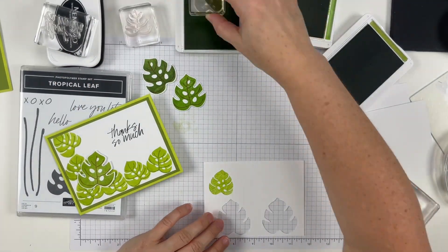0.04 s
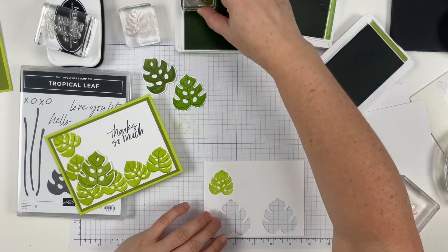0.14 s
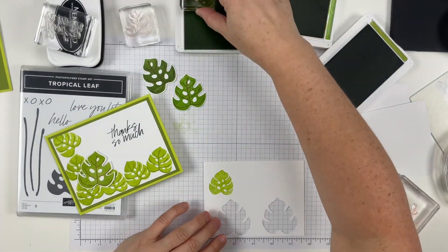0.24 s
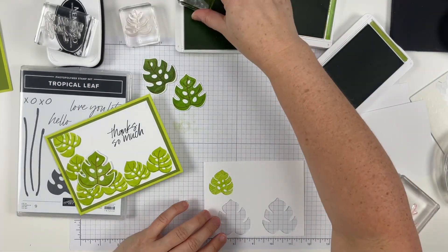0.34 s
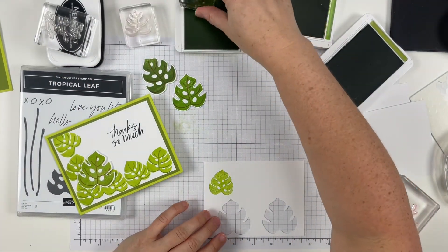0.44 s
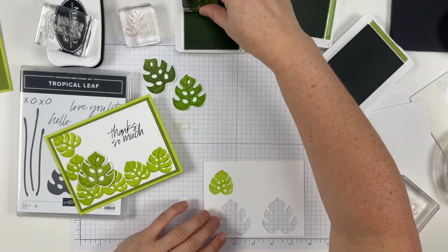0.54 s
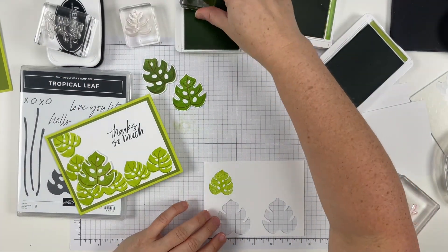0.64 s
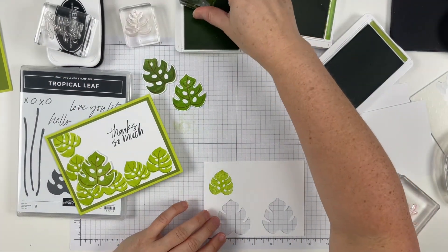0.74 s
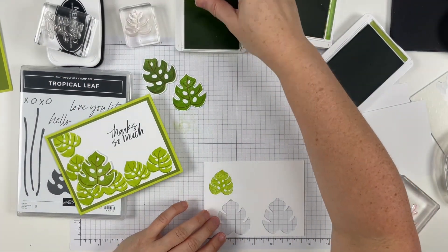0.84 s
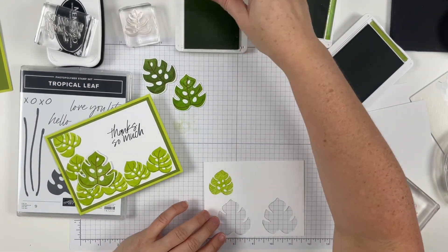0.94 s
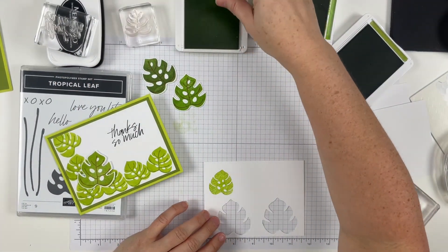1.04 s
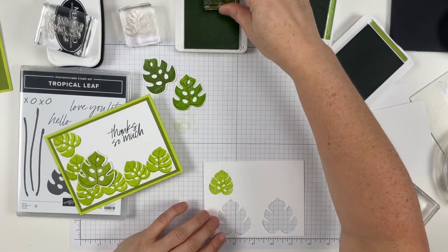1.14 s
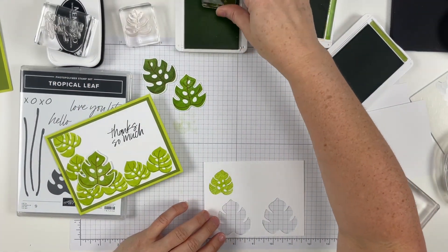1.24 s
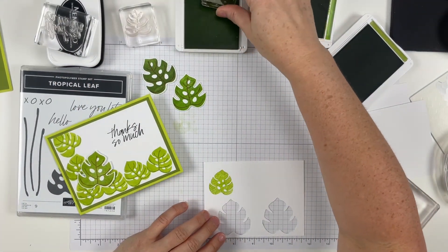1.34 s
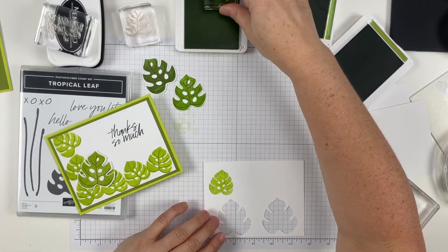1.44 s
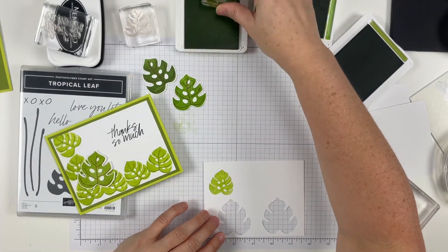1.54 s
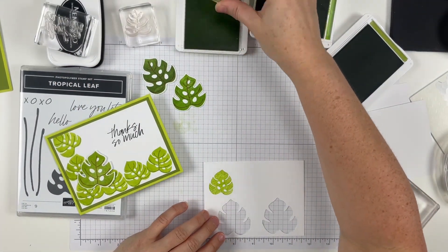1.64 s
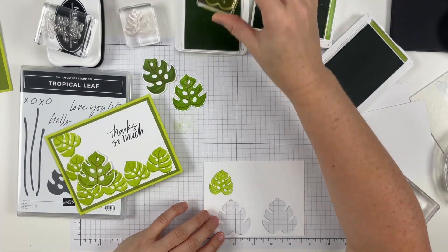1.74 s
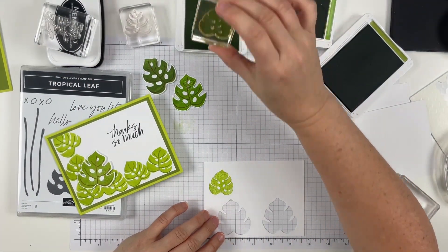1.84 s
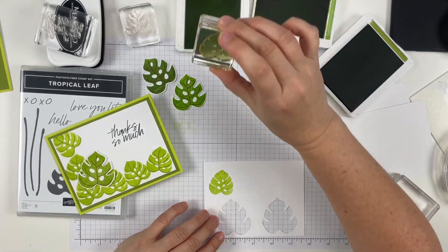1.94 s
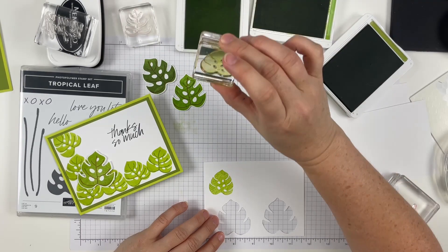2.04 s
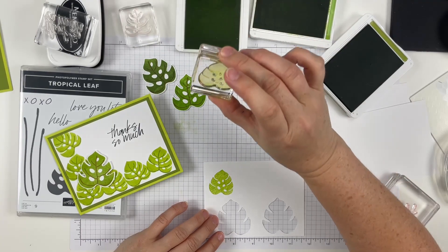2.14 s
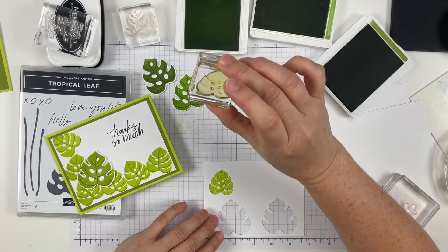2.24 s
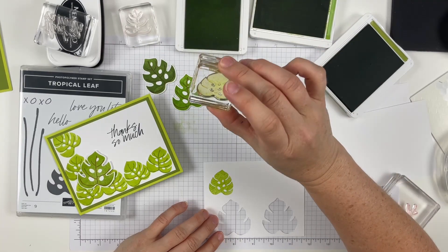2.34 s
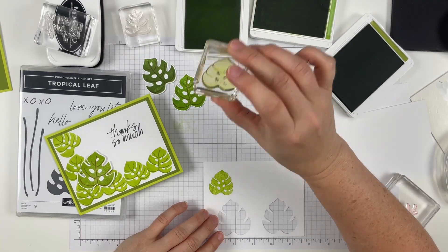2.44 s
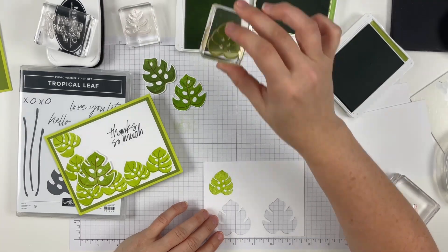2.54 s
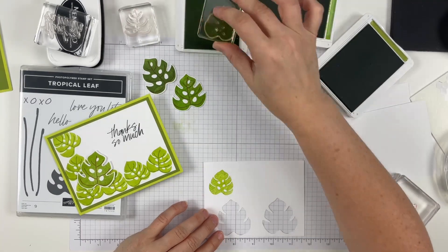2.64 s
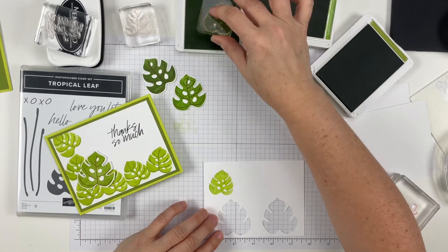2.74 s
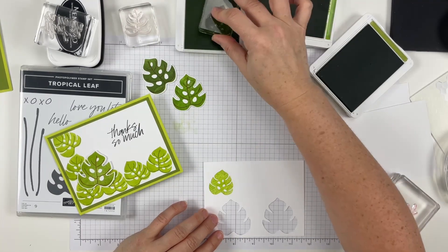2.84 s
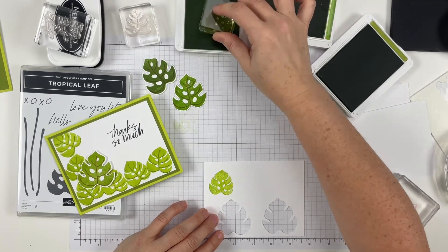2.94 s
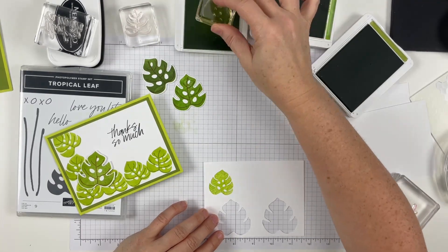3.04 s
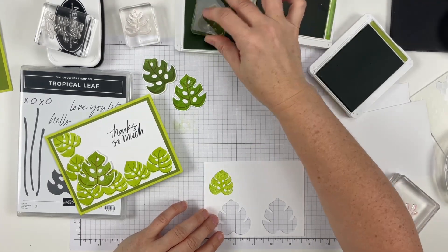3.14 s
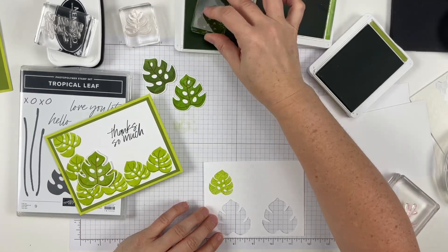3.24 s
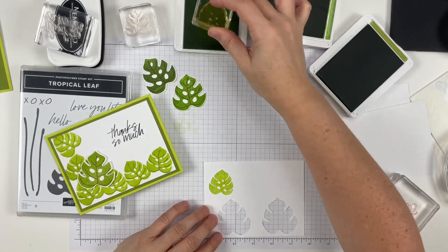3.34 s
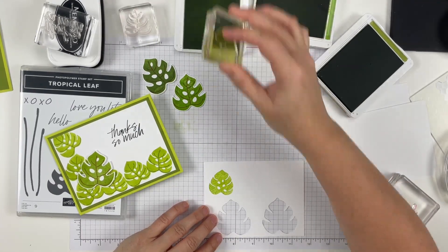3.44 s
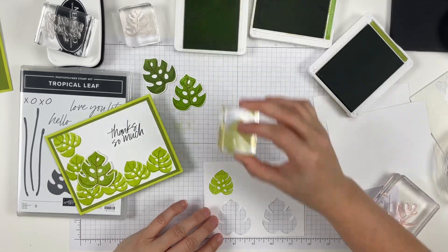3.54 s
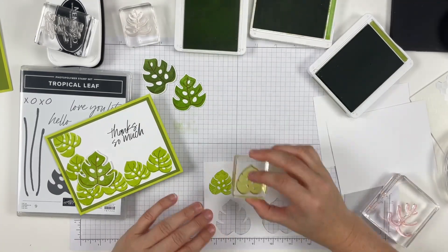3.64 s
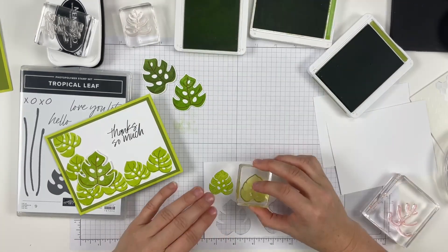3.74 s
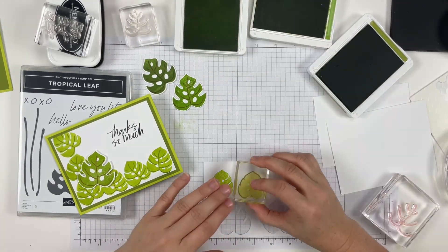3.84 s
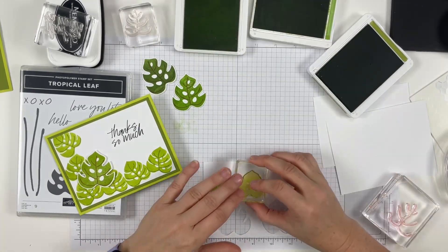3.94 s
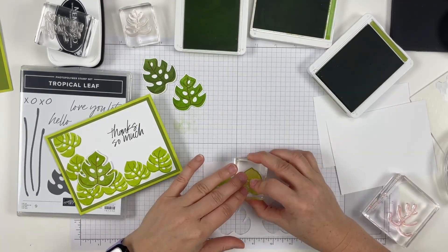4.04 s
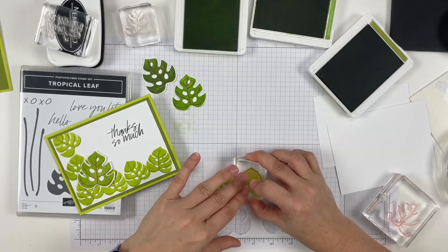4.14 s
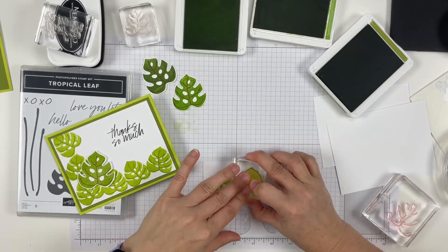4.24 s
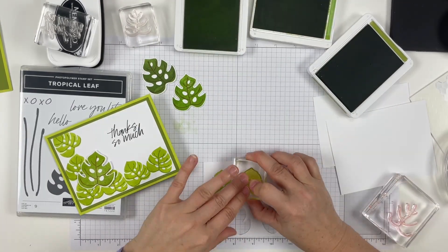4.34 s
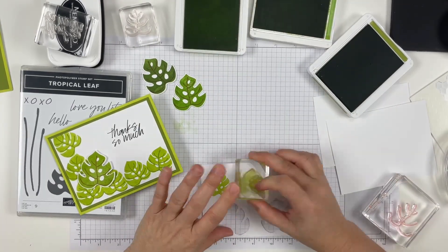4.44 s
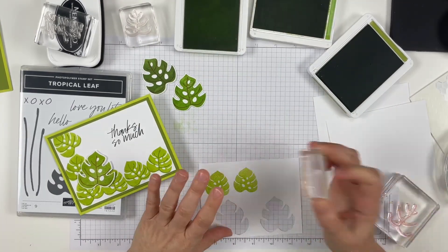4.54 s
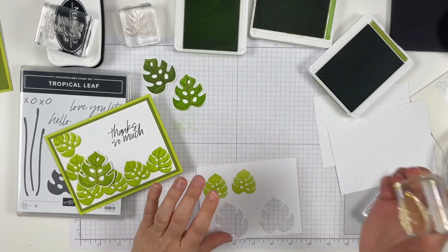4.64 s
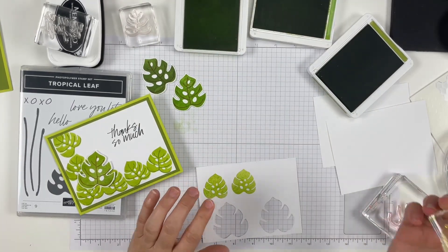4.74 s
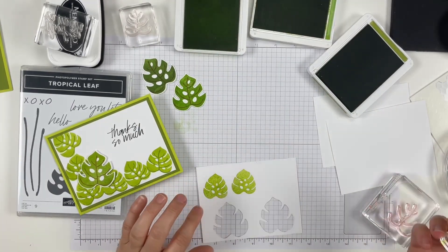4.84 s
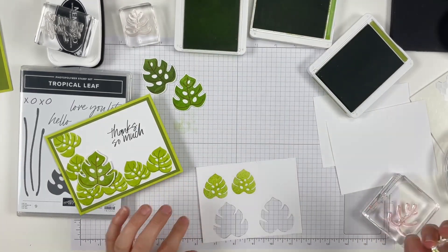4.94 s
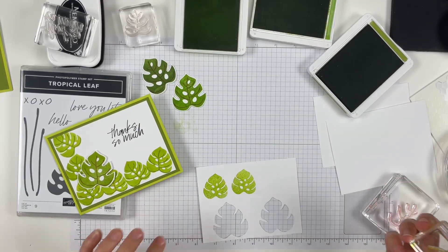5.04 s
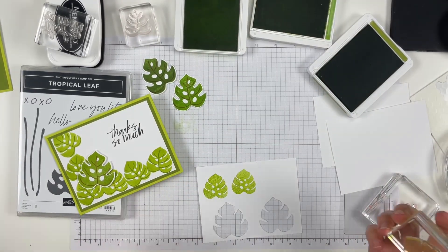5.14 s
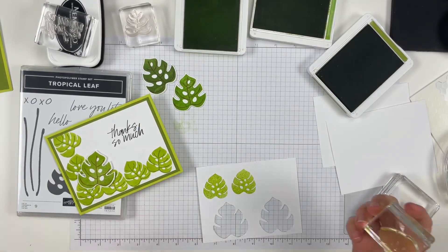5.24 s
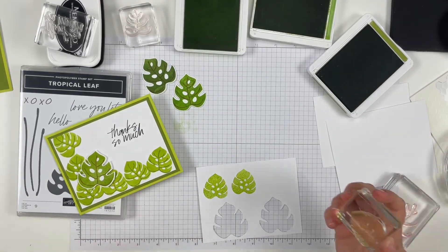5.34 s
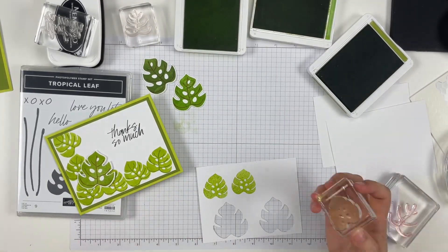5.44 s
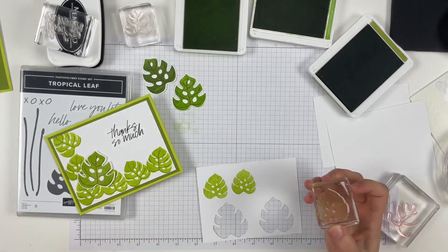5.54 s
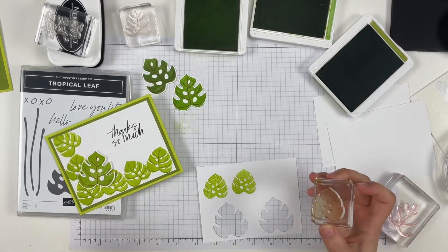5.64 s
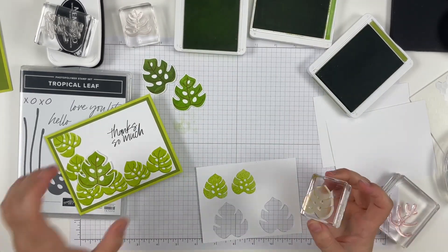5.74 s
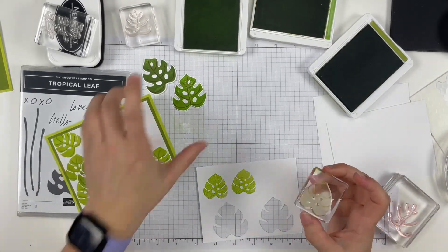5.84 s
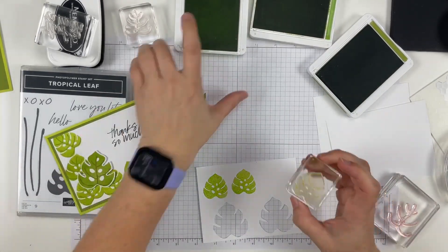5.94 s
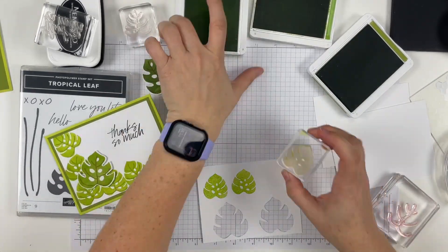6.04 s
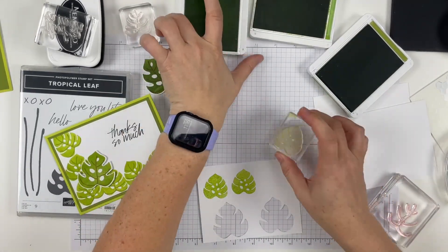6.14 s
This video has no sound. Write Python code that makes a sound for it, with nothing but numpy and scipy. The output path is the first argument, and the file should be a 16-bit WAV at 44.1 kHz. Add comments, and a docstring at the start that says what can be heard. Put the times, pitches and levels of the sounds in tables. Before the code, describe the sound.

Close mono pickup over a craft desk with faint low air rumble. A loud thud and plastic knock land on an ink pad, then quiet sticky crackles and wet foam sucks. A quick group of three softer and firmer dabs follows, then a heavy woody thump through card. The stamp ticks and peels away, blocks are fumbled, two hard acrylic pieces clack brightly, and skin brushes paper. The room is small and dry.

```python
"""Soft thuds of an acrylic stamp block on an ink pad come first, with sharp knocks of its rim on the case.
At the desk the block then goes down on cardstock, peels off and clacks against a second block.
Each contact is a short push that rings the desk, the case or the acrylic; a small dry room answers.
Tacky rubber breaks loose in bursts of snaps, and hands slide over paper as shaped hiss.
The one close microphone over the desk hears faint air noise and clips where the sound passes full scale."""
import sys
import numpy as np
from scipy import signal
from scipy.fft import rfft, irfft
from scipy.io import wavfile

SR = 44100
rng = np.random.default_rng(int(sys.argv[2]) if len(sys.argv) > 2 else 0)


def bounce(signal):
    """Save signal as a 16-bit WAV file at the path given by the first command-line argument."""
    frames = np.transpose(np.atleast_2d(signal))
    limited = np.clip(frames, -1, 1)
    pcm = np.round(limited * 32767).astype(np.int16)
    wavfile.write(sys.argv[1], SR, pcm)


N = 273640  # length in samples
RING = SR // 2  # samples that each ring or echo may last

# Rubber landing on the foam pad, which shakes the desk.
# Each row: start in seconds, level in dB, contact brightness in Hz, resonance of the struck spot in Hz.
DAB_EVENTS = [(.1985, -5, 527, 330), (.8485, 11, 420.6, 297.8), (1.1595, -8.5, 226, 320),
              (2.7935, -0.5, 390, 330), (2.9865, -7, 600, 130), (3.1745, 5.5, 620, 335),
              (3.325, -19.5, 700, 145)]
# Colour of the dab's push. Each row: frequency in Hz, relative level in dB.
DAB_COLOUR = [(20, -20.5), (45, -4), (100, -3), (260, -1), (480, -11), (800, -17), (2000, -33),
              (8000, -60.5)]
# Modes of the desk. Each row: frequency in Hz, level over the push in dB before ring_db, t60 in seconds.
DESK_MODES = [(42, 10, 0.08), (121, 2, 0.1), (225.8, -9, 0.27), (261, -4, 0.13), (325, -2.5, 0.076),
              (427, -7, .16), (498, -2, .15)]


def dabs():
    """A hard dab bottoms out the foam, so its push is shorter and has less deep bass."""
    landings = blows(DAB_EVENTS, DAB_COLOUR, DESK_MODES, ring_db=1.0, spot_db=5.5, spot_t60=0.018,
                     clutter_db=-15.5, clutter_s=0.00087, room_db=-9.5,
                     bass_hz=20, bass_octaves_per_db=0.27)
    return rebound(landings)


def rebound(landings, db=-6, hz=190, lag_s=0.024):
    """The desk top flexes back after a soft, heavy landing: a second, duller bump."""
    out = landings.copy()
    add(out, lag_s, amp(db) * soften(landings, hz))
    return out


# The block's rim hitting the plastic case of the pad.
# Each row: start in seconds, level in dB, contact brightness in Hz, resonance of the struck spot in Hz.
KNOCK_EVENTS = [(.523, -22, 8500, 1363), (.8364, -6, 4470, 310), (.8476, 7.5, 14900, 2833),
                (.8642, -4, 10000, 3590), (1.263, -41, 3920, 1420), (2.9845, -5, 4800, 1900),
                (2.9895, -7.5, 3500, 520), (3.1738, -30, 3530, 1850), (3.2065, -40.5, 4000, 3400)]
# Colour of the knock's push. Each row: frequency in Hz, relative level in dB.
KNOCK_COLOUR = [(40, -16), (130, -2.5), (300, 7.5), (560, 1), (950, -2), (1400, -2.5), (2100, -10.5),
                (2800, -8), (3400, -11.5), (4000, -7), (5500, -21), (7500, -26.5), (11000, -35),
                (16000, -45.5)]
# Modes of the pad case. Each row: frequency in Hz, level over the push in dB before ring_db, t60 in seconds.
CASE_MODES = [(121, 10, 0.2), (275, 1.5, 0.089), (467, 0.5, 0.24), (1440, 5, 0.094), (3480, 2.5, 0.11)]


def knocks():
    """Light knocks of the rim on the case leave the heavy desk still, so they are thinner."""
    return blows(KNOCK_EVENTS, KNOCK_COLOUR, CASE_MODES, ring_db=-2, spot_db=0.5, spot_t60=0.007,
                 clutter_db=5.0, clutter_s=0.0025, room_db=-4.0,
                 bass_hz=104.8, bass_octaves_per_db=-0.11)


# The block meeting card and desk, and rocking under the fingers.
# Each row: start in seconds, level in dB, contact brightness in Hz, resonance of the struck spot in Hz.
PRESS_EVENTS = [(3.571, -25.5, 6000, 680), (4.039, 15.5, 4830, 499), (4.173, -14, 9000, 1140),
                (4.202, -15.5, 9100, 1220), (4.223, -13.5, 7000, 1110), (4.245, -23, 9000, 1150)]
# Colour of the press's push. Each row: frequency in Hz, relative level in dB.
PRESS_COLOUR = [(40, -23.5), (125, -13), (260, 5.5), (500, -3.5), (800, -3), (1250, -5), (1750, -7.5),
                (2200, -23.5), (3600, -27.5), (5200, -40.5), (8000, -55.5), (16000, -60)]


def stamping():
    """The block pushes on the card and rings the desk beneath it."""
    return blows(PRESS_EVENTS, PRESS_COLOUR, DESK_MODES, ring_db=2, spot_db=7.5, spot_t60=0.048,
                 clutter_db=-1, clutter_s=0.0047, room_db=-7,
                 bass_hz=38, bass_octaves_per_db=0.02)


# Acrylic striking acrylic.
# Each row: start in seconds, level in dB, contact brightness in Hz, resonance of the struck spot in Hz.
CLACK_EVENTS = [(5.3995, 10.5, 11000, 2223)]
# Colour of the clack's push. Each row: frequency in Hz, relative level in dB.
CLACK_COLOUR = [(60, -33), (280, -28), (520, 0.5), (950, 1), (1600, 0.5), (2200, 2.5), (3200, 2),
                (4600, -1.5), (5500, -12.5), (7500, -12), (9500, -20.5), (12800, -21), (14000, -25.5),
                (16000, -39)]
# Modes of the acrylic. Each row: frequency in Hz, level over the push in dB before ring_db, t60 in seconds.
ACRYLIC_MODES = [(795, -7, 0.12), (947, -5.5, 0.26), (1082, 4.5, 0.31), (2100, 1, 0.05),
                 (2840, -9.5, 0.058), (3110, -5, 0.067), (3566, 0, .14)]


def clack():
    """Two hard blocks meet in a bright push and the acrylic rings."""
    return blows(CLACK_EVENTS, CLACK_COLOUR, ACRYLIC_MODES, ring_db=4.5, spot_db=-15, spot_t60=0.02,
                 clutter_db=-5.5, clutter_s=0.0017, room_db=-0.54, bass_hz=100)


# One block being set aside and the next gripped.
# Each row: start in seconds, level in dB, contact brightness in Hz, resonance of the struck spot in Hz.
BUMP_EVENTS = [(4.6201, -13.5, 7200, 820), (5.169, -38.5, 5010, 1788), (5.2603, -15, 6920, 1400),
               (5.369, -17, 1200, 600), (5.382, -5, 3000, 676), (5.3957, -10.5, 1800, 670)]
# Colour of the bump's push. Each row: frequency in Hz, relative level in dB.
BUMP_COLOUR = [(50, -18), (200, -6.5), (450, 7), (850, -0.5), (1300, -9), (1800, -4.5), (2500, -17),
               (4000, -13), (6000, -24), (16000, -20)]


def bumps():
    """Blocks are handled, and the fingers mute the acrylic's ring."""
    return blows(BUMP_EVENTS, BUMP_COLOUR, ACRYLIC_MODES, ring_db=-13.5, spot_db=6.5, spot_t60=0.027,
                 clutter_db=3, clutter_s=0.0016, room_db=2.4, bass_hz=170)


def blows(events, colour, modes, ring_db, spot_db, spot_t60, clutter_db, clutter_s, room_db,
          bass_hz, bass_octaves_per_db=0):
    """Each blow rings the object and a short spot resonance; its bass edge can move with the force."""
    out = np.zeros(N)
    held_modes = [(hz, db + ring_db, t60) for hz, db, t60 in modes]
    for start, db, bright_hz, spot_hz in events:
        ring = soften(body(colour, [*held_modes, (spot_hz, spot_db, spot_t60)]), bright_hz)
        edge_hz = min(bass_hz * 2 ** (bass_octaves_per_db * db), SR / 10)
        bass_cut = signal.butter(2, edge_hz, "high", fs=SR, output="sos")
        blow = unit(signal.sosfilt(bass_cut, ring))
        add(out, start, amp(db) * room(blow, room_db, clutter_db, clutter_s))
    return out


def body(colour, modes):
    """A push and the decaying modes that it sets ringing."""
    t = np.arange(RING) / SR
    ring = np.zeros(RING)
    for hz, db, t60 in modes:
        damping = np.log(1000) / t60
        strength = amp(db) * 2 * damping / SR  # about the mode's level at its own pitch
        ring += strength * np.exp(-damping * t) * np.cos(2 * np.pi * hz * t)
    ring[0] += 1  # the push itself
    return signal.fftconvolve(push(colour), ring)[:RING]


# Tacky rubber and fingertips letting go.
# Each row: start in seconds, level in dB, length in seconds, brightness in Hz.
CRACKLE_EVENTS = [(1.392, -28.5, 0.017, 3930), (1.586, -25.5, .024, 3200), (1.782, -33, 0.0044, 9030),
                  (2.138, -21, 0.0072, 7120), (2.215, -22, .012, 4100), (2.584, -20.5, 0.033, 3500),
                  (2.661, -12.5, .013, 10000), (2.73, -14.5, .012, 9000), (2.7655, -16, .006, 12400)]
# Colour of each snap. Each row: frequency in Hz, relative level in dB.
CRACKLE_COLOUR = [(60, -49), (250, 3.5), (450, 8), (650, -6.5), (950, 3), (1300, -3.5), (1850, 1.5),
                  (2500, -8), (3700, 4.5), (4900, -5.5), (6200, -15), (9000, -15.5), (16000, -23)]


def crackles():
    """Sticky ink breaks in crackles, each with a softer trail."""
    return unstick(with_trails(CRACKLE_EVENTS), CRACKLE_COLOUR, grain_db=1.0, room_db=-2, count=36)


def with_trails(events, trail_db=-6, stretch=1.9, dulling=0.55):
    """After each crackle the last threads of ink tear: weaker, longer and duller."""
    bursts = []
    for start, db, length, hz in events:
        bursts.append((start, db, length, hz))
        bursts.append((start + length, db + trail_db, length * stretch, hz * dulling))
    return bursts


# The wet foam letting go of the stamp.
# Each row: start in seconds, level in dB, length in seconds, brightness in Hz.
SUCK_EVENTS = [(.795, -22, 0.034, 1200), (1.598, -14, .016, 1540), (2.664, -19, 0.023, 1200)]
# Colour of the hollow suck. Each row: frequency in Hz, relative level in dB.
SUCK_COLOUR = [(60, -11), (250, -9.5), (340, -14), (430, 7), (560, -14), (1000, -17), (3000, -16.5),
               (12000, -31)]


def sucks():
    """Wet foam lets go in dull snaps with a hollow colour."""
    return unstick(SUCK_EVENTS, SUCK_COLOUR, grain_db=1.0, room_db=-10.0)


# The stamp peeling off the card, and rubber or fingers brushing the paper.
# Each row: start in seconds, level in dB, length in seconds, brightness in Hz.
PEEL_EVENTS = [(3.708, -30, 0.043, 9100), (4.441, -21.5, .012, 12000), (4.453, -15, .02, 12700),
               (6.115, -22.5, .085, 14800)]
# Colour of each snap. Each row: frequency in Hz, relative level in dB.
PEEL_COLOUR = [(100, 12.5), (700, -6.5), (2400, -2.5), (3900, 5), (5500, -5.5), (8000, -10), (16000, -8.5)]


def peel():
    """Rubber leaves or brushes the paper in dense bursts of snaps."""
    return unstick(PEEL_EVENTS, PEEL_COLOUR, grain_db=-0.5, room_db=-6.0, count=120)


def unstick(events, colour, grain_db, room_db, count=24):
    """A sticky contact breaks in a burst of tiny snaps of uneven size."""
    out, snap = np.zeros(N), push(colour)
    for start, db, length, bright_hz in events:
        place, size, sign = rng.random((count, 3)).T
        heights = np.sign(sign - 0.5) * amp(-grain_db * np.log(1 - size))
        snaps = np.zeros(RING)
        np.add.at(snaps, (place * length * SR).astype(int), heights)
        burst = unit(soften(signal.fftconvolve(snaps, snap)[:RING], bright_hz))
        add(out, start, amp(db) * room(burst, room_db, clutter_db=-6, clutter_s=0.0081))
    return out


# A hand or forearm sweeping over paper.
# Each row: time of fastest motion in seconds, level in dB, time to slow down in seconds.
STROKES = [(.04, -63.5, 0.24), (3.68, -66.5, 0.9), (4.301, -62.5, 0.26), (4.82, -62, .18),
           (5.88, -57.5, 0.14), (6.17, -60.5, 0.21)]
# Colour of the slide. Each row: frequency in Hz, relative level in dB.
SLIDE_COLOUR = [(100, 4), (600, 0.5), (1500, -1.5), (2400, -6), (3700, 1.5), (5500, -12.5), (9000, -19.5),
                (16000, -19)]


def hands(grain_db=3, rise=0.96):
    """Skin drags over paper fibres: an uneven hiss that swells and fades with the speed of each stroke."""
    t = np.arange(N) / SR
    power = np.zeros(N)
    for peak_s, db, slowing in STROKES:
        # rise is the time to gather speed, as a share of the time to slow down
        away = np.maximum((peak_s - t) / rise, t - peak_s) / slowing
        power += amp(db) ** 2 * np.exp(-2 * away)
    fibres = np.repeat(rng.standard_normal(N // 128 + 1), 128)[:N]  # a new roughness every 128 samples
    hiss = rng.standard_normal(N) * amp(grain_db * fibres)
    return tint(hiss, SLIDE_COLOUR) * np.sqrt(power)


# Room decay. Each row: frequency in Hz, t60 in seconds.
ROOM_DECAY = [(100, 0.4), (300, 0.21), (800, 0.34), (1800, 0.27), (4200, 0.33), (7000, 0.27), (11000, 0.2),
              (16000, 0.28)]


def room(x, room_db, clutter_db, clutter_s, build_s=0.0049):
    """Direct sound, quick scatter from things on the desk, and a diffuse tail that decays band by band."""
    t = np.arange(RING) / SR
    hz, t60 = np.transpose(ROOM_DECAY)
    noise = rfft(rng.standard_normal(RING))
    log_hz = np.log(np.fft.rfftfreq(RING, 1 / SR) + 1)
    tail = np.zeros(RING)
    for band, decay in zip(np.eye(len(hz)), t60):
        band_noise = irfft(noise * np.interp(log_hz, np.log(hz), band), RING)
        tail += band_noise * np.exp(-np.log(1000) * t / decay)
    tail *= 1 - np.exp(-(t / build_s) ** 2)  # echoes take a moment to build up
    # the scatter spreads the blow in time but adds little colour
    bounces = rfft(rng.standard_normal(RING) * t * np.exp(-2 * t / clutter_s))
    scatter = irfft(bounces / np.abs(bounces), RING) * np.exp(-t / (10 * clutter_s))
    paths = amp(room_db) * unit(tail) + amp(clutter_db) * unit(scatter)
    paths[0] += 1  # direct sound
    return signal.fftconvolve(x, paths)


# Colour of the air noise. Each row: frequency in Hz, relative level in dB.
AIR_COLOUR = [(12, -33), (20, -2), (98, -8.5), (129, -8.5), (175, -18.5), (201, -19), (274, -20),
              (306, -12.5), (332, -27.5), (439, -23), (613, -28.5), (745, -26.5), (1130, -35),
              (3850, -39.5), (15500, -43.5)]


def air(air_db=-56.5, hum_hz=127, hum_width_hz=14, hum_db=-65):
    """Low ventilation rumble with one droning resonance, under a faint even hiss."""
    rumble = tint(rng.standard_normal(N), AIR_COLOUR)
    resonance = signal.iirpeak(hum_hz, hum_hz / hum_width_hz, fs=SR)
    drone = signal.lfilter(*resonance, rng.standard_normal(N))
    return amp(air_db) * rumble + amp(hum_db) * unit(drone) * np.sqrt(N)


def amp(db):
    """Decibels to gain."""
    return 10 ** (np.asarray(db) / 20)


def unit(x):
    """Scale to unit energy."""
    return x / np.sqrt(np.sum(x ** 2))


def gains(points, size):
    """Gain at every bin of a transform, from (Hz, dB) points."""
    hz, db = np.transpose(points)
    log_hz = np.log(np.fft.rfftfreq(size, 1 / SR) + 1)
    return amp(np.interp(log_hz, np.log(hz), db))


def tint(x, points):
    """Colour a signal of full length and bring it to rms 1."""
    return unit(irfft(rfft(x) * gains(points, N), N)) * np.sqrt(N)


def push(points, size=4096):
    """The most compact causal pulse with this colour (minimum phase, by folding the cepstrum)."""
    cepstrum = irfft(np.log(gains(points, size)))
    cepstrum[1:size // 2] *= 2
    cepstrum[size // 2 + 1:] = 0
    return irfft(np.exp(rfft(cepstrum)))


def soften(x, hz):
    """A softer contact loses its treble."""
    return signal.sosfilt(signal.butter(2, min(hz, 0.45 * SR), fs=SR, output="sos"), x)


def add(out, start, x):
    """Mix x into out from a start in seconds."""
    i = int(start * SR)
    out[i:i + len(x)] += x[:N - i]


def scene():
    """Inking, stamping and changing blocks, heard by one microphone over the desk."""
    contacts = dabs() + knocks() + stamping() + clack() + bumps()
    sticking = crackles() + sucks() + peel()
    return (contacts + sticking + hands() + air())[None]


def record(dry, top_hz=15500):
    """The microphone input clips at full scale, then the extreme treble is cut."""
    clipped = np.clip(dry, -1, 1)
    treble_cut = signal.ellip(8, 0.1, 60, top_hz, fs=SR, output="sos")
    return signal.sosfilt(treble_cut, clipped)


dry = scene()
out = record(dry)
bounce(out)
```